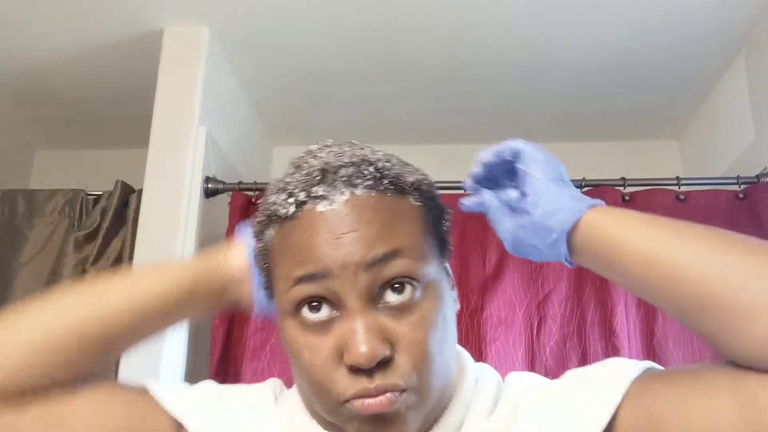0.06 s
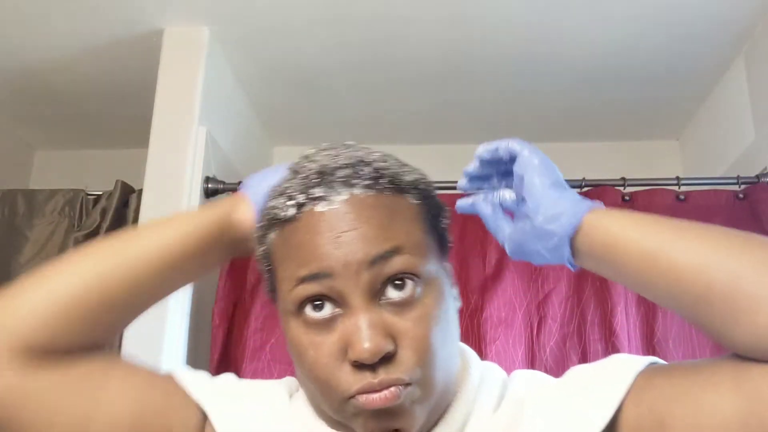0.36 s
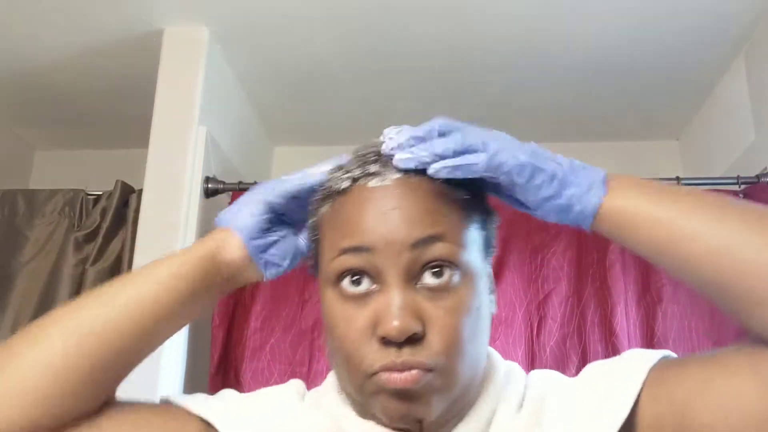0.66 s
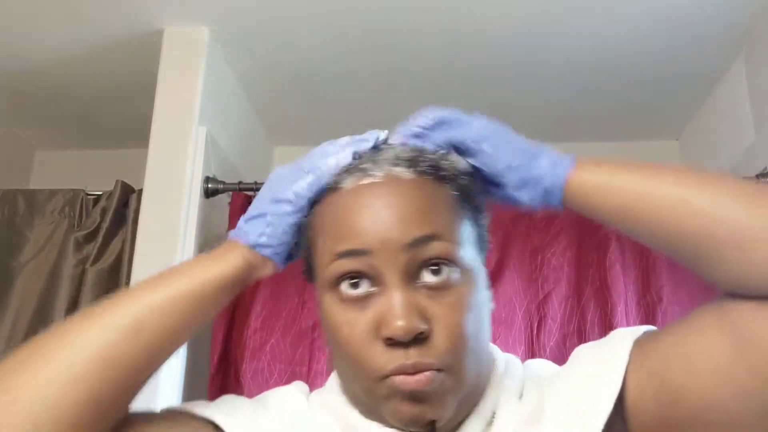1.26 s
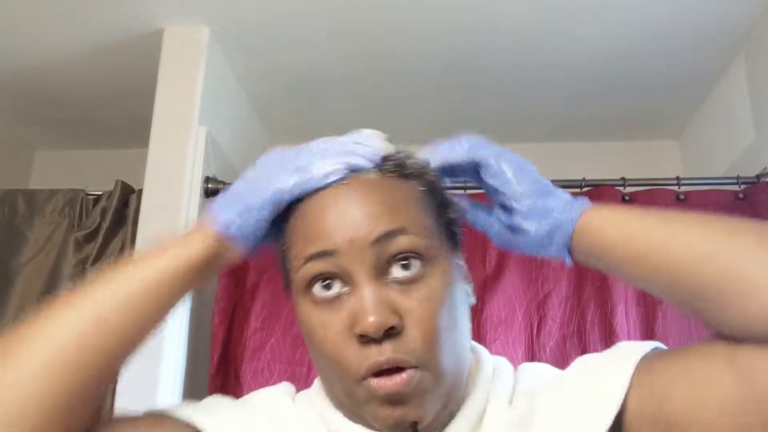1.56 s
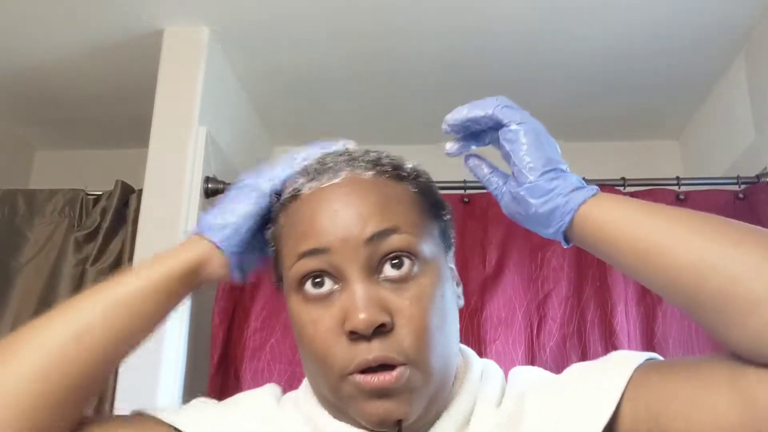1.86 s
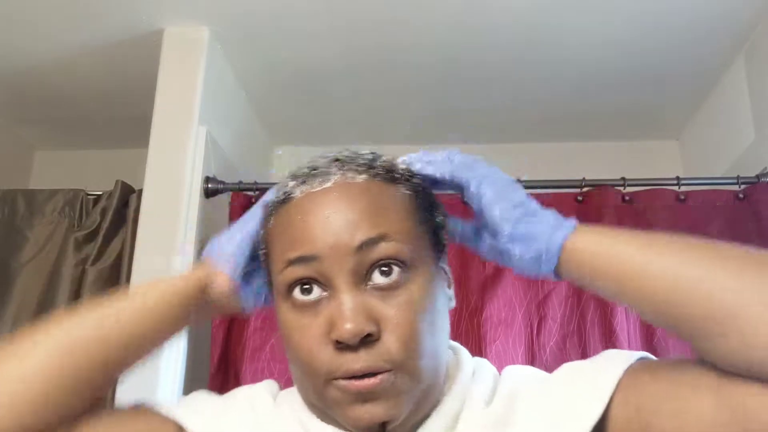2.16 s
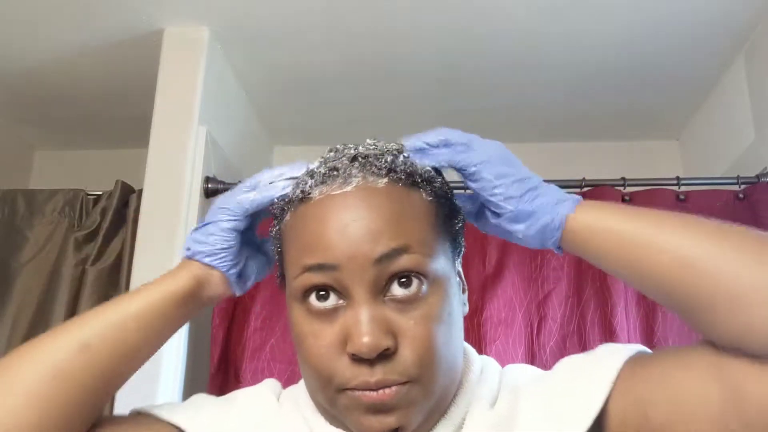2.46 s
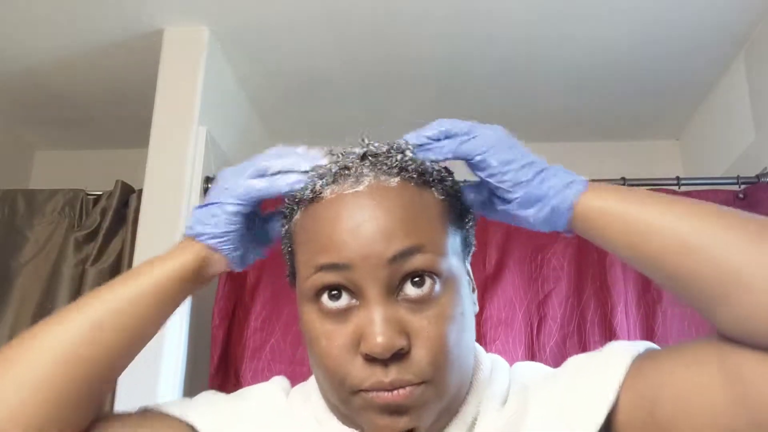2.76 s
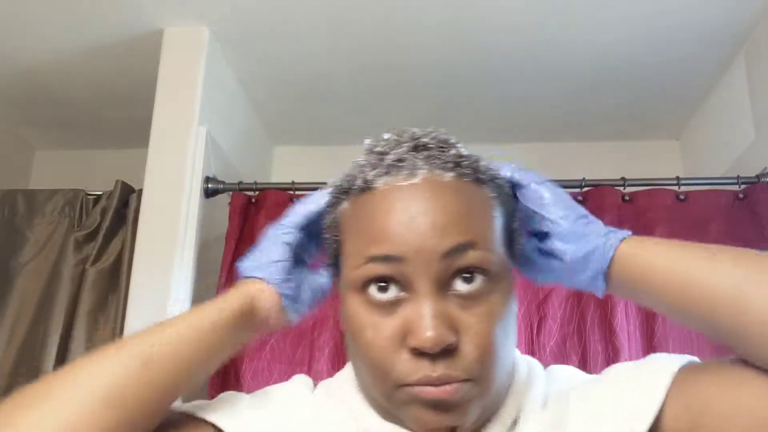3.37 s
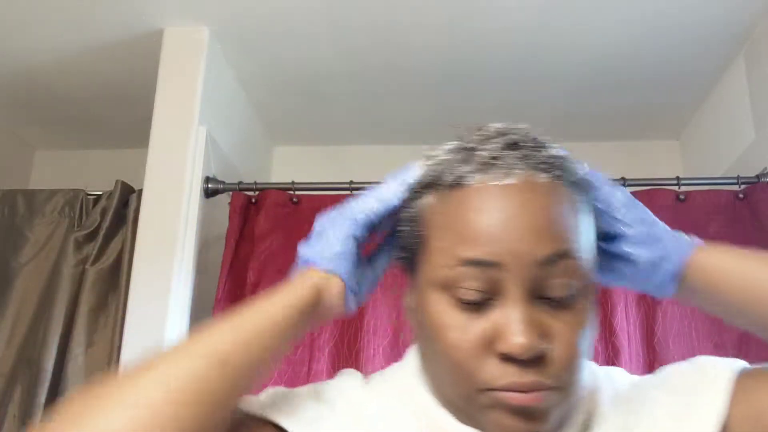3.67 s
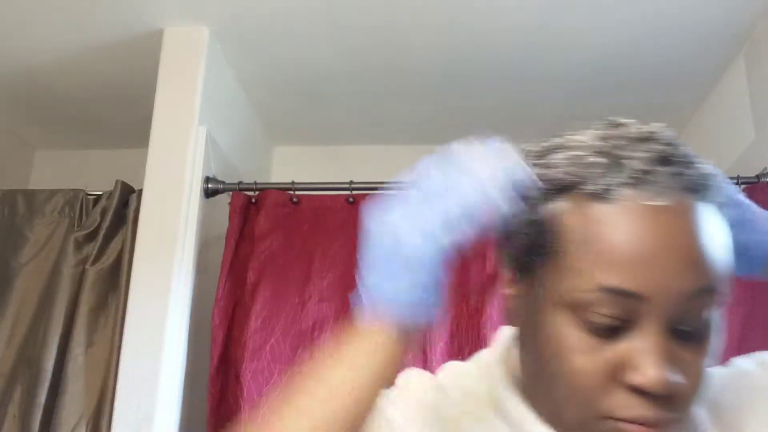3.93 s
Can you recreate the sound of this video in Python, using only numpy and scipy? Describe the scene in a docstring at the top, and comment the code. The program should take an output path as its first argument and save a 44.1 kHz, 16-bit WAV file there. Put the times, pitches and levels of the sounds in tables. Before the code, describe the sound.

Soft, fizzing swishes of lathered hair being rubbed by gloved hands move from slow strokes to quick back-and-forth ones. Faint squelches and small rubber scratches sound near the microphone, with a low motor hum in the quiet room.

```python
"""Gloved hands massage lather into short hair: long smears at first, then quick to-and-fro scrubbing.
Each stroke flicks wet hairs and bursts tiny bubbles, a fine fizzing swish. Foam squelches under
the palms, their hollows ring dully, the rubber scratches and snaps, and two soft landings ring the head.
A low motor hum and the faint noise of a small quiet room run underneath."""
import sys
import numpy as np
from scipy import signal
from scipy.fft import rfft, irfft
from scipy.io import wavfile

SR = 44100
rng = np.random.default_rng(int(sys.argv[2]) if len(sys.argv) > 2 else 0)


def master_out(mix):
    """Clip the mix to full scale and print it as 16-bit PCM to the path in sys.argv[1]."""
    frames = np.transpose(np.atleast_2d(mix))
    ceiling = np.clip(frames, -1, 1)
    pcm = np.round(ceiling * 32767).astype(np.int16)
    wavfile.write(sys.argv[1], SR, pcm)


N = 176400
T = np.arange(N) / SR
FREQS = np.maximum(np.arange(N // 2 + 1) * SR / N, 1)

# wet hair spectrum (frequency [Hz], relative density [dB])
HAIR_SPECTRUM = [(200, -47), (600, -12.5), (1200, -10), (1600, -0.5), (1900, -7.5), (2400, 0.5),
                 (3400, 2.5), (4100, 1.8), (4900, -1), (5700, 3.5), (6700, -4), (7500, 0), (8300, -4.5),
                 (9000, -4), (9600, 0), (10500, -6), (11800, -2.5), (12600, -7.5), (14000, -0.5),
                 (16000, -5)]
# left-right likeness of hair and of palm sounds (frequency [Hz], likeness [-])
HAIR_LIKENESS = [(700, -1), (1500, 2.1), (2300, 0.26), (3200, 0.33), (4500, -0.11), (8500, 0), (12000, 0),
                 (16000, 0.2)]
PALM_LIKENESS = [(350, 0.36), (520, 0.056), (800, 0.065), (1250, 1), (1700, 0.75), (3000, 0.41)]


def from_db(db):
    """Decibels to gain."""
    return 10 ** (np.asarray(db) / 20)


def unit_rms(x):
    """Scale to rms 1."""
    return x / np.sqrt(np.mean(x ** 2) + 1e-20)


def over_time(points):
    """Interpolate (time [s], value) rows linearly."""
    return np.interp(T, *np.transpose(points))


def over_hz(points):
    """Interpolate (frequency [Hz], value) rows on a log axis."""
    hz, value = np.transpose(points)
    return np.interp(np.log(FREQS), np.log(hz), value)


def drift(rate_hz):
    """Smooth random wander, rms 1."""
    return unit_rms(irfft(rfft(rng.standard_normal(N)) / (1 + (FREQS / rate_hz) ** 2), N))


def swell(start_s, length_s, rise_s, decay_s):
    """Smooth rise, hold, exponential release after length_s."""
    rise = np.sin(np.pi / 2 * np.clip((T - start_s) / rise_s, 0, 1))
    return rise * np.exp(-np.maximum(T - start_s - length_s, 0) / decay_s)


def resonance(spectrum, hz, width_hz):
    """One peak of a spectrum as a signal, rms 1."""
    return unit_rms(irfft(spectrum / (1 + ((FREQS - hz) / width_hz) ** 2), N))


def grains(per_s, spread_db):
    """Random clicks of uneven size and sign."""
    sizes = from_db(spread_db * np.minimum(rng.exponential(1, N), 4))
    return sizes * rng.choice([-1, 1], N) * (rng.random(N) < per_s / SR)


def crackle(per_s, spread_db, hiss_share=0.7):
    """Two grain streams, blurred by smooth hiss from the walls."""
    clicks = unit_rms(np.array([grains(per_s, spread_db) for _ in range(2)]))
    return np.sqrt(1 - hiss_share) * clicks + np.sqrt(hiss_share) * rng.standard_normal((2, N))


def coloured(pair, spectrum, likeness, balance_db=0):
    """Two unrelated signals to stereo of given colour and width, rms 1."""
    mid, side = rfft(pair)
    alike = np.clip(over_hz(likeness), -1, 1)
    signs = np.array([[1], [-1]])
    stereo = np.sqrt(1 + alike) * mid + np.sqrt(1 - alike) * side * signs
    return unit_rms(irfft(stereo * from_db(over_hz(spectrum) + signs * balance_db / 2), N))


def noise(likeness, spectrum=((1, 0),)):
    """Stereo noise, white by default, rms 1."""
    return coloured(rng.standard_normal((2, N)), spectrum, likeness)


def room_tone():
    """Low rumble and air, with faint narrow resonances that swell and fade."""
    # room noise (frequency [Hz], relative density [dB])
    air_spectrum = [(15, 3), (26, -2), (42, -11), (58, -2), (82, 2), (110, -2.5), (135, -11), (175, -22.5),
                    (250, -27), (400, -25), (500, -24.5), (800, -23), (1200, -31.5), (3000, -40.5),
                    (16000, -50)]
    # resonances (frequency [Hz], level [dB], width [Hz])
    tones = [(156.5, -72, 2), (196.5, -81, 4), (328.5, -79.5, 5.5), (464, -77, 8.8), (531, -76, 7.7),
             (609, -84, 6), (653.4, -78.5, 5), (866, -78.5, 19)]
    # left-right likeness (frequency [Hz], likeness [-])
    air_likeness = [(60, 1), (130, 0.95), (250, 0.83), (350, 0), (520, 0), (800, 0.12), (1400, 0.0058),
                    (4000, 0)]
    tone_likeness = [(160, 0.91), (330, 0.93), (520, 0.47), (850, 0.24)]
    air = from_db(-51) * noise(air_likeness, air_spectrum)
    drive = rfft(noise(tone_likeness))
    return air + sum(from_db(db) * resonance(drive, hz, width_hz) for hz, db, width_hz in tones)


def motor_hum():
    """A low motor tone; the level wavers, the pitch sags slightly."""
    # hum level (time [s], level [dB])
    levels = [(0, -45), (.8, -45.5), (1.4, -49), (1.85, -47), (2.15, -43), (2.7, -45), (3.2, -45.5),
              (3.55, -43), (4, -44)]
    start_hz, sag_hz_per_s, waver_db = 98.8, 0.57, 0.5
    phase = 2 * np.pi * np.cumsum(start_hz - sag_hz_per_s * T) / SR
    gain = from_db(over_time(levels) - waver_db * drift(rate_hz=30))
    return np.sqrt(2) * gain * np.sin(phase) * from_db([[-0.5], [0.5]])


def head_bumps():
    """A hand lands softly and sets the head ringing briefly."""
    # landings (time [s], level [dB])
    landings = [(1.204, -58), (1.581, -66)]
    # head modes (frequency [Hz], gain [dB], t60 [s])
    modes = [(207, 1, 0.055), (324, -1, 0.055), (440, 1, .06), (670, 0, .05), (830, 2, .04)]
    out = np.zeros(N)
    for start_s, db in landings:
        age_s = np.maximum(T - start_s, 0)
        for hz, mode_db, t60_s in modes:
            envelope = from_db(db + mode_db - 60 * age_s / t60_s)
            out += envelope * np.sin(2 * np.pi * hz * age_s) * rng.choice([-1, 1])
    return out


def glove_snaps(rise_s=0.0002, decay_s=0.00097):
    """Tiny bright ticks as tacky rubber lets go of the lather."""
    # releases (time [s], level [dB])
    snaps = [(1.586, -47), (1.6965, -36), (2.0864, -40), (2.531, -46), (3.0543, -52), (3.9706, -47)]
    # tick spectrum (frequency [Hz], relative density [dB])
    spectrum = [(1000, -38), (4000, 2), (9000, 4), (14000, 8)]
    # left-right likeness (frequency [Hz], likeness [-])
    likeness = [(3000, -0.2), (9000, -0.56)]
    envelope = sum(from_db(db) * swell(start_s, rise_s, rise_s, decay_s) for start_s, db in snaps)
    return noise(likeness, spectrum) * envelope


def glove_scratches(rise_s=0.0017, decay_s=0.022, width_oct=0.57):
    """Short runs of coarse grains as rubber grips a tuft and tears free."""
    # scratches (time [s], level [dB], centre [Hz])
    scratches = [(.059, -61, 3300), (0.358, -59.5, 1810), (0.801, -61, 2800), (.908, -57, 3600),
                 (.95, -58, 3900), (1.155, -64, 3400), (1.373, -56.5, 5960), (1.664, -55, 12000),
                 (1.686, -58, 13000), (1.731, -54, 4800), (2.085, -66, 7500), (3.608, -54, 3820),
                 (3.755, -65, 11000)]
    grit = rfft(coloured(crackle(per_s=4000, spread_db=1), HAIR_SPECTRUM, HAIR_LIKENESS))
    out = 0
    for start_s, db, hz in scratches:
        band = unit_rms(irfft(grit / (1 + (np.log2(FREQS / hz) / width_oct) ** 2), N))
        out += band * from_db(db) * swell(start_s, rise_s, rise_s, decay_s)
    return out


def palm_kneading(pitch_swing=0.037):
    """The cupped palm rings dully where it presses; its pitch shifts as the hand flexes."""
    # presses (start [s], length [s], level [dB], resonance [Hz], width [Hz])
    presses = [(0, 0.18, -72.5, 804, 150), (0.24, 0.27, -67.5, 750, 170), (0.794, .03, -65, 1560, 100),
               (0.817, 0.07, -70, 296, 100), (1.144, 0.059, -65.5, 1500, 120), (1.678, 0.12, -70, 453, 130),
               (1.725, 0.037, -65, 760, 200), (1.73, 0.062, -63.5, 1530, 130),
               (1.803, 0.027, -63.5, 1380, 130), (1.9, 0.049, -66.5, 1560, 130),
               (2.014, 0.043, -63.5, 1520, 110), (2.244, 0.068, -70, 784, 150), (2.48, 0.087, -65, 540, 30),
               (2.628, 0.086, -66.5, 363, 80), (2.96, 0.069, -65, 420, 130), (3.205, 0.1, -63.5, 370, 130),
               (3.317, 0.31, -67.5, 420, 130), (3.435, 0.062, -68, 440, 70), (3.123, 0.22, -69.5, 1670, 55),
               (3.432, 0.08, -64.5, 1720, 80), (3.73, 0.14, -67, 420, 123)]
    rub = rfft(noise(PALM_LIKENESS))
    samples = np.arange(N)
    warped = (samples + np.cumsum(pitch_swing * drift(rate_hz=7))) % N
    out = 0
    for start_s, length_s, db, hz, width_hz in presses:
        highpassed = rub / (1 + (hz / 2 / FREQS) ** 4)
        hollow = resonance(highpassed, hz, width_hz)
        flexed = np.array([np.interp(warped, samples, channel) for channel in hollow])
        out += flexed * from_db(db) * swell(start_s, length_s, rise_s=0.027, decay_s=0.0075)
    return out


def shifting_colour(x, swing_ms=0.2):
    """Short drifting delays give the noise a faint, shifting, phasey colour; rms 1."""
    # delay taps (delay [ms], gain [dB])
    taps = [(1.3, -8.5), (2.9, -10), (5.2, -12.5), (11, -9)]
    out = x
    for ms, db in taps:
        delay = np.round((ms + swing_ms * drift(rate_hz=1.2)) * SR / 1000).astype(int)
        out = out + from_db(db) * x[:, (np.arange(N) - delay) % N]
    return unit_rms(out)


def foam_squelch(trim_db=-0.73, rise_s=0.0042, decay_s=0.017):
    """Dull grains of foam pressed under the palms, with spurts as pockets give way."""
    # foam spectrum (frequency [Hz], relative density [dB])
    spectrum = [(200, -3), (330, -2.5), (480, -1.5), (750, -6.5), (1150, -1), (1450, -3.5), (1680, -2.5),
                (1950, -6.5), (2700, -4.5), (4500, -21.5), (9000, -46)]
    # running squelch (time [s], level before trim [dB])
    levels = [(0.0, -61), (0.13, -84), (0.17, -66), (0.4, -77), (0.56, -60), (0.69, -91), (0.77, -64),
              (0.96, -66), (1.2, -63.5), (1.27, -75), (1.37, -63.5), (1.61, -67.5), (1.77, -59.5),
              (2.0, -63), (2.04, -63), (2.07, -60.5), (2.55, -70), (3.52, -59.5), (3.72, -66.5),
              (3.79, -61), (3.98, -76), (4.0, -86)]
    # collapsing pockets (time [s], level [dB])
    pockets = [(0.36, -65), (1.752, -62), (2.648, -61.5), (2.985, -59), (3.277, -56.5), (3.335, -60)]
    foam = coloured(crackle(per_s=2500, spread_db=2.5), spectrum, PALM_LIKENESS)
    power = from_db(over_time(levels) + trim_db) ** 2
    for start_s, db in pockets:
        power += (from_db(db) * swell(start_s, rise_s, rise_s, decay_s)) ** 2
    return shifting_colour(foam) * np.sqrt(power)


def bubble_pops(per_s=380, sizes=12, t60_cycles=9.3):
    """Bubbles burst and ring briefly, each size at its own pitch; rms 1."""
    rings = np.zeros((2, N))
    for hz in np.geomspace(3000, 14500, sizes):
        radius = from_db(-60 * hz / (t60_cycles * SR))
        angle = 2 * np.pi * hz / SR
        clicks = np.array([grains(per_s / sizes / 2, spread_db=2) for _ in range(2)])
        feedback = [1, -2 * radius * np.cos(angle), radius ** 2]
        rings += signal.lfilter([0, np.sin(angle)], feedback, clicks + 1e-18)
    mid, side = rings
    return unit_rms(np.array([mid + side, mid - side]))


def hair_swish():
    """Hairs flick and bubbles burst as the gloves slide; some strokes are brighter, some raspier."""
    # glove strokes (start [s], length [s], level [dB], extra treble [dB], extra rasp [dB])
    strokes = [(-.05, 0.082, -54.5, -0.5, -2), (0.041, 0.029, -52.5, -1, 0.5), (0.114, 0.12, -52.5, -2, -4),
               (0.21, 0.08, -54.5, -0.5, -5), (0.317, 0.17, -55, 2, 0), (0.485, 0.14, -53, -1.5, -2),
               (0.703, 0.11, -52, -0.5, -2), (0.805, 0.21, -56, 2.5, 3), (1.037, 0.11, -57.5, 4.5, 3.5),
               (1.124, 0.11, -58, 2.5, 2.5), (1.248, 0.14, -58, 2.5, 7), (1.343, 0.06, -59.5, 2, 8.5),
               (1.385, .15, -56, 1, 2.5), (1.537, 0.074, -66.5, 4.5, 3), (1.609, 0.11, -55.5, 6, 0.5),
               (1.687, 0.14, -55, 5, 1.5), (1.8, 0.077, -65, 10, 4), (1.863, 0.1, -57, -0.5, -2.5),
               (1.975, 0.079, -55, 2, 0.5), (2.046, 0.12, -59, 6, 1), (2.14, 0.13, -59.5, 2, -1),
               (2.255, 0.11, -58, -0.5, -1), (2.364, 0.092, -56.5, 2, 2.5), (2.512, 0.095, -57, 0.5, 4),
               (2.664, 0.075, -53.5, 0, 3), (2.782, 0.1, -59.5, 2.5, 3.5), (2.918, 0.093, -54, -1, 1),
               (3.051, 0.11, -55, 0.5, 2), (3.206, 0.079, -53.5, -3, 0), (3.328, 0.1, -55.5, 0, 1.5),
               (3.416, .08, -54.5, -2.5, -4), (3.519, 0.13, -54, -1, 1.5), (3.693, 0.099, -52.5, -2.5, 1),
               (3.852, 0.087, -57, -0.5, 2.5)]
    # stereo balance (frequency [Hz], left minus right [dB])
    balance = [(2000, 2), (4000, -0.9), (6500, 0.8), (7700, -1.5), (9000, 0), (11800, -4), (13000, -4.5),
               (13800, 8), (15600, -2.5)]
    pops_db, resting_db, catch_db = -14, -69, 0.59
    treble_hz, rasp_hz, rasp_width_hz = 6300, 3870, 710
    flicks = coloured(crackle(per_s=9000, spread_db=0.5), HAIR_SPECTRUM, HAIR_LIKENESS, over_hz(balance))
    fizz = rfft(shifting_colour(flicks) + from_db(pops_db) * bubble_pops())
    treble = 1 - 1 / (1 + (FREQS / treble_hz) ** 6)
    rasp = (1 - treble) / (1 + ((FREQS - rasp_hz) / rasp_width_hz) ** 4)  # rubber dragging on hair
    bands = (1 - treble - rasp, treble, rasp)
    power = from_db(resting_db) ** 2
    for start_s, length_s, db, treble_db, rasp_db in strokes:
        stroke = swell(start_s, length_s, rise_s=min(0.084, length_s), decay_s=0.041)
        band_gains = from_db([db, db + treble_db, db + rasp_db])
        power = power + np.outer(band_gains, stroke) ** 2
    swish = sum(irfft(fizz * band, N) * gain for band, gain in zip(bands, np.sqrt(power)))
    return swish * from_db(catch_db * drift(rate_hz=20))  # the glove catches and slips


def scene():
    """Hands and foam over the hum and rumble of the room."""
    return (hair_swish() + foam_squelch() + palm_kneading() + motor_hum() + room_tone()
            + glove_scratches() + glove_snaps() + head_bumps())


def record(dry):
    """Steep low-pass."""
    cutoff_hz, edge_hz = 15850, 100
    return irfft(rfft(dry) * np.clip((cutoff_hz - FREQS) / edge_hz + 0.5, 0, 1), N)


dry = scene()
out = record(dry)
master_out(out)
```